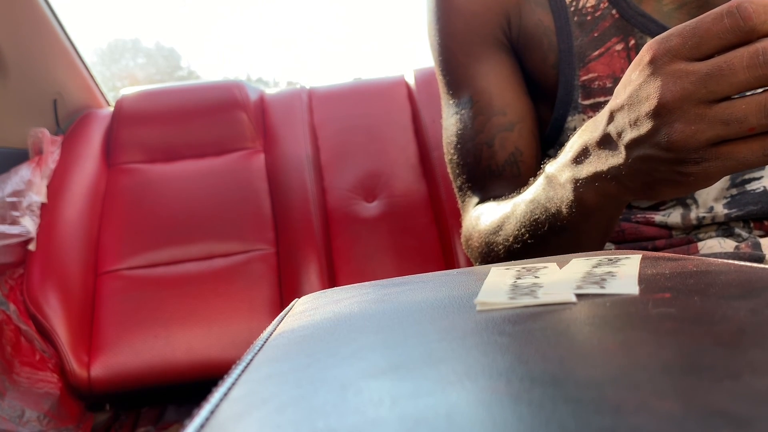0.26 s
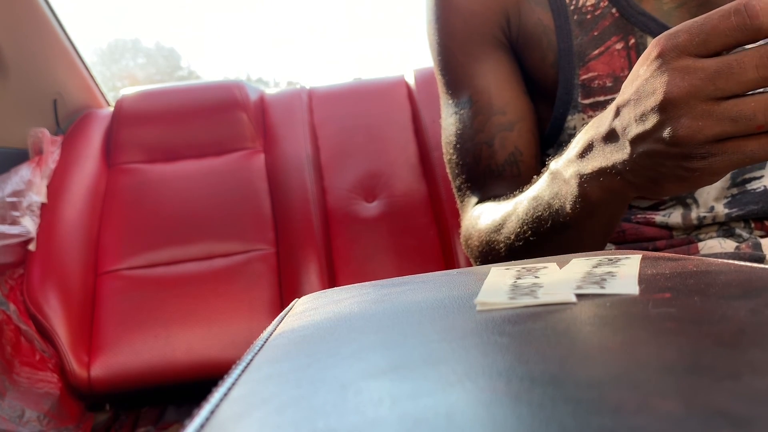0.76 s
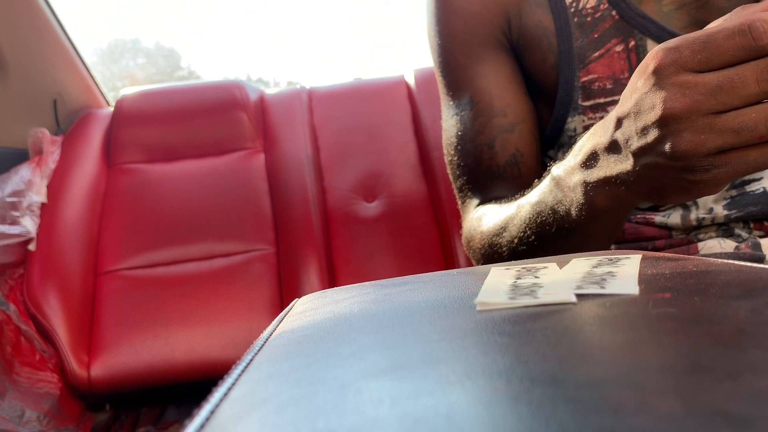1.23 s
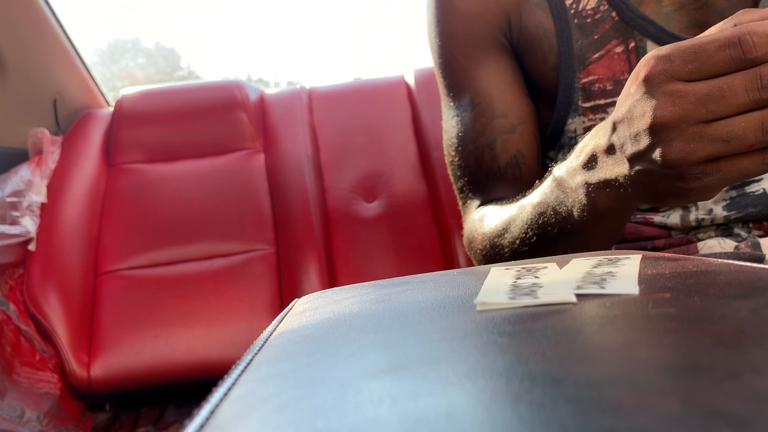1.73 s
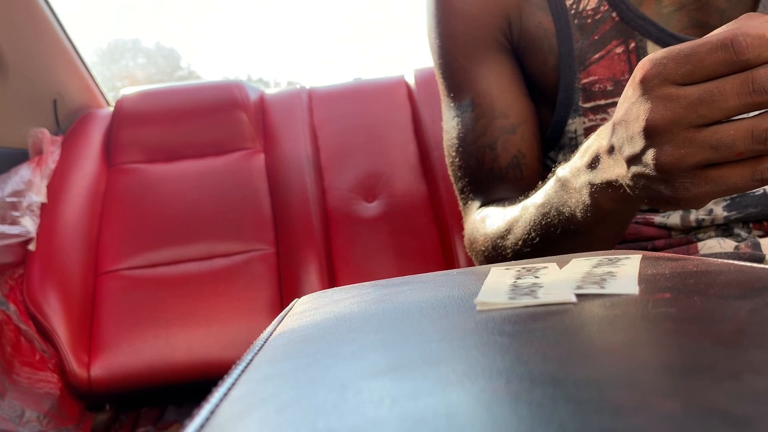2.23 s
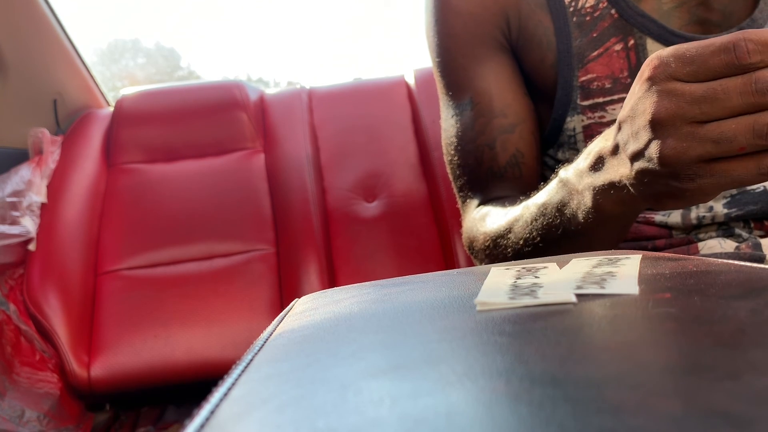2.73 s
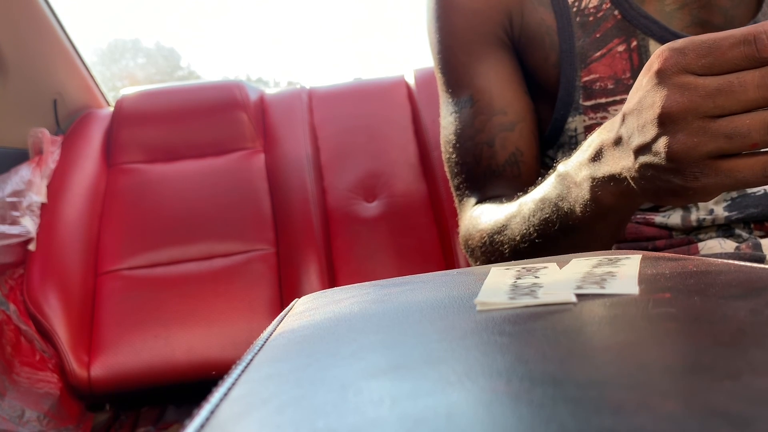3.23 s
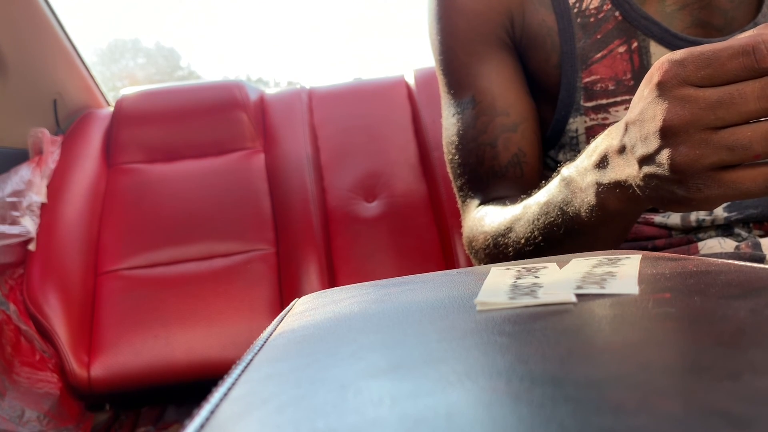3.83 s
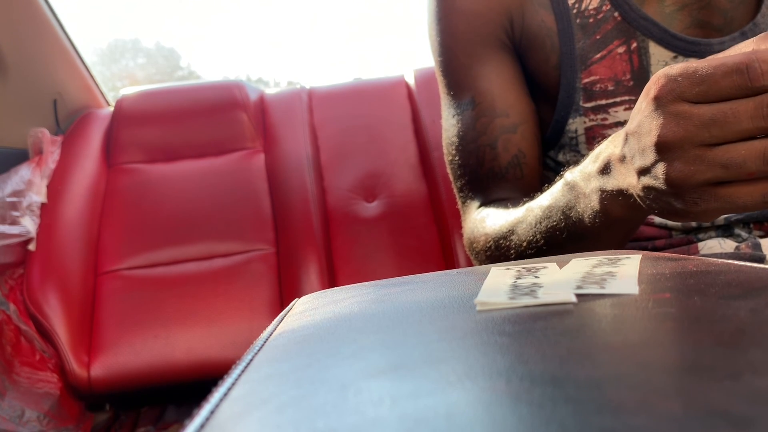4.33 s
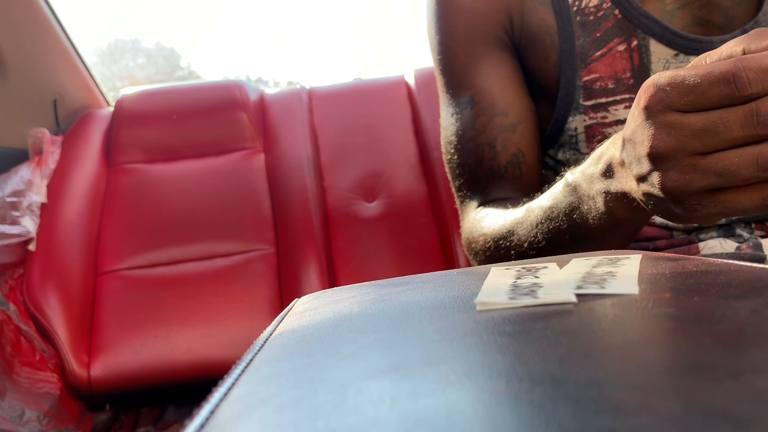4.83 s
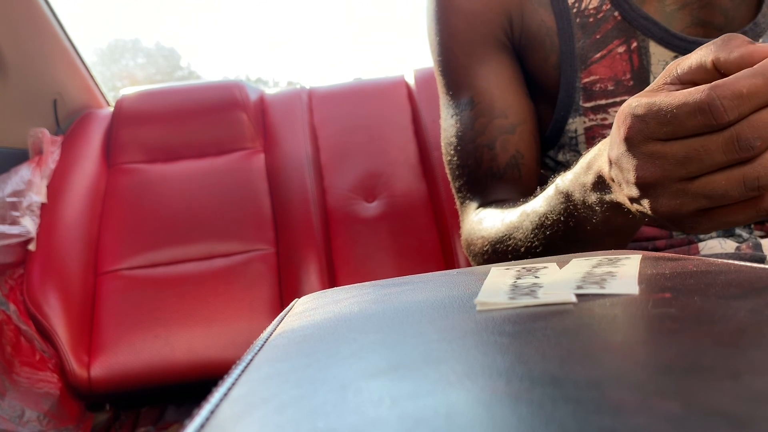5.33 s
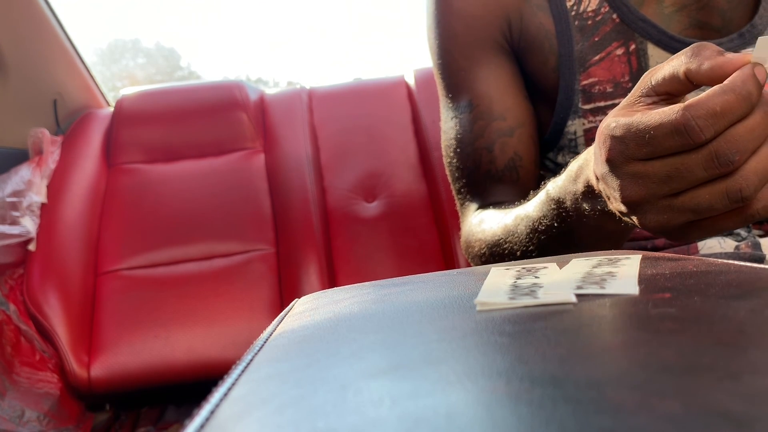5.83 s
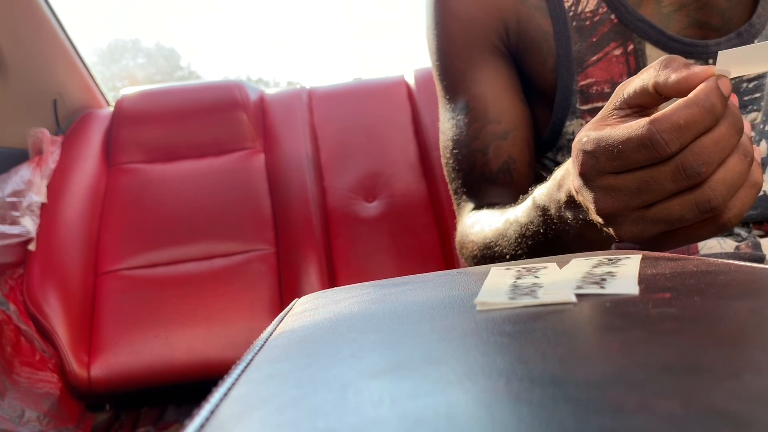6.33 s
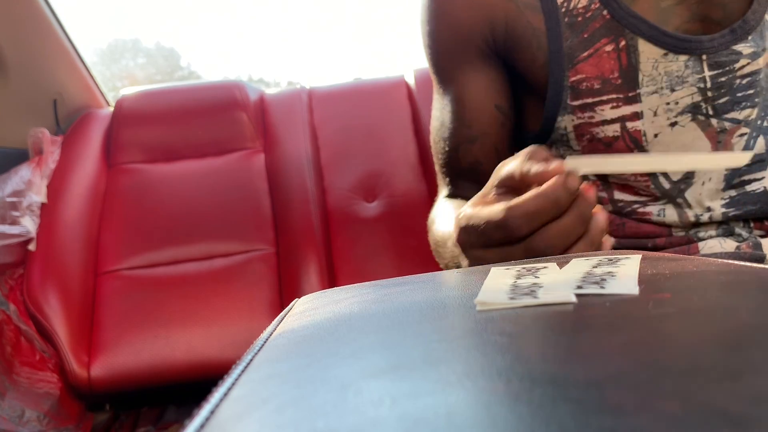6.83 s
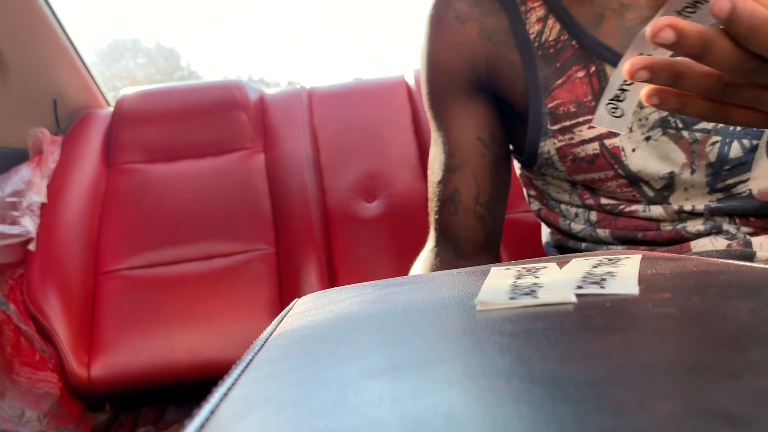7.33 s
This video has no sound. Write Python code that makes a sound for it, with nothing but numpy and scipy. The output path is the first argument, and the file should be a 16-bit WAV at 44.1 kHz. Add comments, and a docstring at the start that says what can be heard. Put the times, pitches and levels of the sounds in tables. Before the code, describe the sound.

Bright, dry snaps and fine sticky crackle as fingers peel a vinyl decal, over the low engine boom and rumble of a moving car.

```python
"""Decal peeling in a moving car

Fingers peel a vinyl decal from its backing, to the right of a phone, as the car pulls away gently.
The sheet snaps in filtered bursts of slips; random tiny fractures make the crackle of the glue.
Filtered noise brushes softly as skin and cloth. Below, sine orders make the engine boom;
shaped noise makes the road rumble, tyre rush, street murmur and an even hiss."""
import sys
import numpy as np
from scipy import signal
from scipy.fft import rfft, irfft, next_fast_len
from scipy.io import wavfile
from scipy.ndimage import uniform_filter1d

SR = 44100
rng = np.random.default_rng(int(sys.argv[2]) if len(sys.argv) > 2 else 0)


def transcribe(u):
    """Save the signal u as a 16-bit wav file named by the first command-line argument.

    u: samples, shape (n,) or (channels, n), limited to [-1, 1]; the rate is SR.
    q: integer samples, one column per channel.
    """
    v = np.clip(np.atleast_2d(u).T, -1, 1)
    q = np.round(v * 32767).astype(np.int16)
    wavfile.write(sys.argv[1], SR, q)


N = 333837
TIME = np.arange(N) / SR

# snaps of the sheet: (time [s], relative level [dB], ring [Hz],
#   relative body below 2.4 kHz [dB], relative edge above 12 kHz [dB])
SNAPS = [(0.2882, -44.5, 4230, -10, -47), (0.829, -47.5, 4200, 3, -6), (0.836, -57, 4620, 0, -10),
         (0.9053, -38, 6460, -6, -25), (0.9114, -37.5, 6720, -6, -19), (0.9298, -29, 6250, -16, -17),
         (0.9418, -34, 6360, -10, -21), (0.9454, -34.5, 6990, -15, -11), (0.9534, -34.5, 4790, -14, -31),
         (0.9911, -32, 8700, -13, -8), (1.9674, -53, 6545, -35, -27), (2.4593, -55, 4000, -19, -11),
         (2.4773, -46, 8780, -10, -7), (2.5052, -50.5, 7930, -6, -8), (3.0126, -47.5, 7250, -25, -22),
         (3.0944, -52.5, 7390, -20, -7), (3.4007, -40, 8700, -14, -11), (3.5384, -38.5, 7200, -17, -14),
         (3.6157, -50, 6740, -18, -7), (3.6431, -37, 8300, -52, -11.5), (4.0213, -43, 8080, -12.5, -11),
         (4.2253, -45.5, 7464, -50, -24), (4.2956, -30.5, 7055, -13, -6), (4.3221, -36, 6700, -19, -19),
         (4.4842, -38.5, 7100, -16, -2), (4.5291, -39.5, 6850, -21, -30), (4.6109, -41, 6503, -25, -18),
         (4.6558, -31, 6960, -18, -1), (4.6833, -34.5, 7210, -36, -11), (4.7455, -37.5, 6410, -32, -18),
         (4.776, -33, 6360, -23.5, -21), (4.8155, -36.5, 6030, -28, -19), (4.9077, -39, 5897, -13, -9),
         (4.997, -38.5, 6250, -34, -14), (5.012, -38, 7560, -35.5, -27), (5.0788, -42, 6650, -23, -25),
         (5.0923, -35, 6540, -62, -26), (5.1271, -38, 6630, -25, -20), (5.1766, -33.5, 6294, -36, -10),
         (5.2515, -34.5, 8590, -57, -6.5), (5.2979, -37, 8320, -16, 0), (5.3398, -21, 7390, -31.5, -19),
         (5.4241, -21, 7130, -18, -2.5), (5.5338, -27.5, 8580, -27, 0), (5.5458, -31.5, 8220, -43, -7),
         (5.6321, -38, 6730, -53, -46), (5.7399, -34, 6360, -38, -26), (5.8517, -40, 6567, -41, -43),
         (5.89, -40, 6517, -29, -22), (5.9756, -42, 6370, -41, -34), (6.0302, -28, 6300, -26, -31),
         (6.1569, -31.5, 8105, -43, -16), (6.3809, -46.5, 5530, -33, -16),
         (6.4906, -25.5, 7850, -17.5, -18), (6.5665, -35, 8260, 0.5, -2.5), (6.6039, -41, 5734, -3, -22)]
# colour of the vinyl sheet: (frequency [Hz], level [dB])
SHEET_COLOUR = [(200, -33), (700, -13), (1500, -3), (3000, -15), (4500, -2), (6500, 1), (8500, 1),
                (11000, -7.5), (15500, -13)]
# tugs that lift the strip: (start at half level [s], length [s], crackle level before sag [dB])
TUGS = [(3.503, 0.04, -82), (3.908, 0.14, -75.5), (4.21, 0.15, -72), (4.285, 0.28, -67),
        (4.608, 0.27, -64.5), (4.902, 0.051, -61), (4.965, 0.17, -65), (5.173, 0.013, -56),
        (5.29, 0.052, -59), (5.489, 0.031, -65), (5.539, 0.27, -69), (5.873, 0.2, -74), (6.108, 0.028, -65),
        (6.203, 0.5, -80.5)]
# strokes of skin and cloth: (centre time [s], length [s], peak level [dB], centre frequency [Hz])
SLIDES = [(0.333, 0.2, -88, 15000), (0.653, 0.061, -82, 8800), (4.365, 0.15, -65, 14100),
          (7.071, 0.34, -77, 11950), (7.206, 0.068, -72.5, 5063)]
# left port against right, for sound from the right: (frequency [Hz], lag [s], level [dB])
PORTS = [(300, .00027, 0), (2500, .00021, 0), (4000, .00029, -3), (5700, .00030, -8), (6400, .00031, -5),
         (7700, .000265, 1), (9000, .00026, -1), (15000, .00026, 0)]
# mean engine speed: (time [s], firing rate [Hz])
ENGINE_SPEED = [(0, 59.75), (0.8, 63.5), (2.08, 67.84), (2.2, 56.6), (3.3, 58.84), (3.55, 71), (3.85, 81.7),
                (4.3, 83.13), (4.9, 85.37), (5.4, 92.64), (5.7, 94.4), (6.05, 100.6), (6.75, 105.3),
                (7.57, 99.4)]
# engine load, swelling the firing tone: (start at half level [s], length [s], level before sag [dB])
SURGES = [(2.23, 1.16, -39), (3.502, 0.22, -34), (3.758, 0.12, -39.5), (3.934, 0.91, -39),
          (5.035, 0.624, -46.5), (5.953, 0.132, -49), (6.491, 0.23, -55)]
# rough road: (centre time [s], full width at 1/e [s], tyre rush level [dB], body rumble level [dB])
PATCHES = [(0.152, 0.77, -94, -54.5), (2.07, 0.47, -67.5, -44.5), (2.263, 0.24, -57.5, -64),
           (2.65, 1, -67.5, -52.5), (3.6, 0.61, -64, -52), (3.956, 0.54, -74, -48.5),
           (6.016, 0.64, -71.5, -48.5), (6.202, 0.23, -63.5, -54.5), (6.578, 0.33, -65, -57),
           (7.52, 0.38, -64.5, -52)]
# colour of the body rumble: (frequency [Hz], level [dB])
RUMBLE_COLOUR = [(15, -23.5), (25, -18), (38, 0.5), (55, 5.5), (72, -0.5), (100, -13), (135, -12.5),
                 (180, -16.5), (250, -27.5), (500, -57), (2000, -100)]
# colour of the tyre rush: (frequency [Hz], level [dB])
RUSH_COLOUR = [(120, -16), (190, -8.5), (270, -6), (320, -1.5), (370, 0.5), (410, -4), (465, 2.5),
               (520, -9.5), (580, -1), (690, -17), (900, -8.5), (1300, -42), (2500, -41.5), (5000, -68),
               (9000, -100)]
# colour of the street murmur: (frequency [Hz], level [dB])
STREET_COLOUR = [(150, -20.5), (400, 0.5), (750, -1.5), (1150, 1), (1450, -6), (1650, -7.5), (2000, -12),
                 (2400, -12), (3200, -19), (5000, -20.5), (9000, -38)]
# colour of the even hiss: (frequency [Hz], level [dB])
HISS_COLOUR = [(1500, -6), (3000, 0), (5500, 2), (7500, -1), (8500, 0), (10000, 0), (12000, -2.5),
               (16000, -5)]

SETTLE_LIMIT_DB = -25.5  # snaps listed above this level free no extra threads
TICK_SHORT_HZ, TICK_LONG_HZ = 7200, 6440  # flap ring when a thick thread breaks: short strip, long strip
TUG_ATTACK_S, TUG_RELEASE_S, TUG_SAG_DB_PER_S = 0.016, 0.079, -17
SURGE_ATTACK_S, SURGE_RELEASE_S, SURGE_SAG_DB_PER_S = 0.11, 0.14, -4.5
ROLLING_S = (3.1, 8.1)  # the car gathers speed between these times
IDLE_DB, IDLE_FADE_DB = -53.5, -18.5  # unloaded firing tone, and its fall as the car gets going
BOOM_HZ, BOOM_WIDTH_HZ, BOOM_DB = 196.4, 17.2, -57  # cabin resonance that the octave crosses
LIFT_S, LIFT_LENGTH_S, LIFT_DB = 6.63, 0.23, -7  # the driver eases off and the octave fades
RUMBLE_DB, RUMBLE_RISE_DB = -54.5, 7.5  # start level, rise with speed
RUSH_DB, RUSH_RISE_DB = -76, 9
TOP_HZ = 16000


def snaps(gain_db=8, burst_s=0.00061, grit=0.28, body_db=18, edge_db=17, ring_db=4, onset_s=.0008, size=512):
    """Each buckle of the sheet is one sharp slip and a sub-millisecond burst of smaller ones."""
    out = np.zeros(N + size)
    decay = np.exp(-np.arange(size) / SR / burst_s)
    slips = grit * rng.standard_normal((len(SNAPS), size)) * decay
    slips[:, 0] = 1
    sheet = response(SHEET_COLOUR)
    for (s, db, hz, body, edge), slip in zip(SNAPS, slips):
        # the free flap rings briefly
        flap = response([(hz * 1.2, 0), (hz, ring_db), (hz * 1.17, 0)])
        click = ring(ring(slip, sheet), flap)
        # per-snap balance of body and edge
        low_db = body + body_db
        tilt = response([(2400, low_db), (3600, low_db / 2 - 4.5), (5500, 0.0054), (8500, 0),
                         (12000, edge + edge_db)])
        click = ring(click, tilt)
        start = int((s + onset_s) * SR)
        out[start:start + size] += undb(db + gain_db) * click / np.linalg.norm(click)
    return out[:N]


def crackle(settle_db=-25, settle_s=0.0061, strain_s=0.004, tick_db=-1, catch_db=3):
    """Glue threads break one by one with each tug, thick ones with a tick; more give way around each snap."""
    peeling = sum(swell(s, length, db, TUG_ATTACK_S, TUG_RELEASE_S, TUG_SAG_DB_PER_S)
                  for s, length, db in TUGS)
    peeling = peeling * undb(catch_db * walk(50))  # the glue catches and gives

    settling = np.zeros(N)
    around = np.arange(-SR // 50, SR // 16)
    # strain builds before the snap, settling follows it
    fade = np.exp(-np.abs(around) / SR / np.where(around < 0, strain_s, settle_s))
    for s, db, *_ in SNAPS:
        settling[int(s * SR) + around] += undb(min(db, SETTLE_LIMIT_DB) + settle_db) * fade

    threads = breaks(per_s=360, scatter_db=6.5) * peeling
    threads = threads + breaks(per_s=1100, scatter_db=6) * settling
    thick = undb(tick_db) * breaks(per_s=120, scatter_db=0.5) * peeling

    # the freed strip grows longer, so its ring sinks
    short = response([(1000, 3.0), (2400, -5.5), (3700, -1), (5500, -15), (6800, -9.5), (8500, -1),
                      (11500, -12.5), (15000, -6)])
    long = response([(1000, 3), (3500, -8), (5000, -12.0), (6300, 8), (8500, -4.5), (11500, 4), (15000, 4)])
    freed = np.interp(TIME, [5.4, 5.75], [0, 1])
    sheet = response(SHEET_COLOUR)
    fine = (1 - freed) * ring(threads, short) + freed * ring(threads, long)
    fine = ring(fine, sheet / np.linalg.norm(sheet))
    ticks = (1 - freed) * flap_ticks(thick, TICK_SHORT_HZ) + freed * flap_ticks(thick, TICK_LONG_HZ)
    return fine + ticks


def breaks(per_s, scatter_db):
    """Random tiny fractures, most small and a few larger; rms 1."""
    sizes = undb(scatter_db * np.minimum(rng.exponential(size=N), 3))
    signs = rng.choice([-1, 1], N)
    return unit((rng.random(N) < per_s / SR) * sizes * signs)


def flap_ticks(x, hz, skirt_db=-20):
    """Breaks heard through the single ring of the free flap."""
    flap = response([(hz * 0.5, -26), (hz * 0.59, -8), (hz, 0), (hz * 1.13, -5), (hz * 2.35, skirt_db)])
    return ring(x, flap / np.linalg.norm(flap))


def slides(skirt_db=-14):
    """Skin and cloth brush the sheet in short swells of fine hiss."""
    out = np.zeros(N)
    for s, length, db, hz in SLIDES:
        stroke = np.cos(np.pi * np.clip((TIME - s) / length, -.5, .5))
        brush = noise([(hz / 8, -40), (hz * 0.71, skirt_db), (hz, 0), (hz * 1.36, skirt_db)])
        out += undb(db) * stroke * brush
    return out


def cabin(x, near_db=-10, near_t60_s=0.0071, tail_db=-14, tail_t60_s=0.094, diffuse_db=-9):
    """Hands and dashboard scatter the sound at once; the padded cabin adds a short tail."""
    t = TIME[:SR // 4]

    def echoes(t60_s):
        """Decaying noise of unit energy after a short gap."""
        h = rng.standard_normal(len(t)) * np.exp(-np.log(1000) * t / t60_s) * (t > .0007)
        return h / np.linalg.norm(h)

    wet = ring(x, undb(near_db) * echoes(near_t60_s) + undb(tail_db) * echoes(tail_t60_s))
    coloured = ring(x, response([(900, -16), (2400, 14.5), (3600, 10.5), (6000, 1.0), (8500, 2.0), (15000, 5)]))
    diffuse = np.array([ring(coloured, echoes(tail_t60_s)) for _ in range(2)])
    return ports(x + wet) + undb(diffuse_db) * diffuse


def engine(shaft_db=-59, waver_db=0.6, octave_db=-74):
    """Only the lowest orders pass the bulkhead: the firing tone, its octave and the turning shaft."""
    hz, = curves(ENGINE_SPEED)
    idle = undb(IDLE_DB + IDLE_FADE_DB * np.interp(TIME, ROLLING_S, [0, 1]) ** 2)
    load = sum(swell(s, length, db, SURGE_ATTACK_S, SURGE_RELEASE_S, SURGE_SAG_DB_PER_S)
               for s, length, db in SURGES)
    resonance = 1 / (1 + (2 * (2 * hz - BOOM_HZ) / BOOM_WIDTH_HZ) ** 2)
    lift_db = LIFT_DB * np.clip((TIME - LIFT_S) / LIFT_LENGTH_S, 0, 1)
    phase = 2 * np.pi * np.cumsum(hz * (1 + 0.0035 * walk(14))) / SR
    phase = phase + np.array([[-.14], [.14]])  # the standing wave differs a little between the ports
    firing = np.hypot(idle, load) * undb(waver_db * walk(22.08)) * np.sin(phase)
    octave_level = np.hypot(undb(octave_db), undb(BOOM_DB) * resonance)
    octave = octave_level * undb(lift_db + 0.91 * walk(24)) * np.sin(2 * phase)
    shaft = undb(shaft_db + 2 * walk(15)) * np.sin(phase / 2)
    return np.sqrt(2) * (firing + octave + shaft) * undb([[-.8], [.8]])


def road(street_db=-75, street_rise_db=4):
    """Body rumble, tyre rush and street murmur grow with speed; each rough patch swells the first two."""
    speed = np.interp(TIME, ROLLING_S, [0, 1])
    shaking = undb(RUMBLE_DB + RUMBLE_RISE_DB * speed)
    rushing = undb(RUSH_DB + RUSH_RISE_DB * speed)
    for s, width, rush_db, rumble_db in PATCHES:
        patch = np.exp(-(2 * (TIME - s) / width) ** 2)
        shaking = np.hypot(shaking, undb(rumble_db) * patch)
        rushing = np.hypot(rushing, undb(rush_db) * patch)

    sway = noise([(20, -16.0), (60, 11.5), (110, 8.5), (190, -9.5), (300, -23), (700, -32.5), (3000, -84.5)])
    rumble = spread(noise(RUMBLE_COLOUR), sway, side_db=-10.5, pan_db=-1.9)
    rumble = rumble * shaking * undb(walk(10))

    rush = ports(noise(RUSH_COLOUR))
    rush = rush + spread(np.zeros(N), noise(RUSH_COLOUR), side_db=-11.0, pan_db=-20)
    rush = rush * rushing * undb(1.1 * walk(15)) * undb([[1.8], [-1.8]])

    waver_db = 0.7 * walk(9)
    street = spread(noise(STREET_COLOUR), noise(STREET_COLOUR), side_db=0.5, pan_db=1.4)
    return rumble + rush + street * undb(street_db + street_rise_db * speed + waver_db)


def hiss(level_db=-82.5):
    """Faint even noise of fixed colour, passed through both ports."""
    return ports(undb(level_db) * noise(HISS_COLOUR))


def ports(x):
    """Sound from the right bends round the phone: later at the left port, its level varying with pitch."""
    size = next_fast_len(N + 64)
    bins = np.fft.rfftfreq(size, 1 / SR)
    hz, lag_s, db = np.transpose(PORTS)
    delay = np.exp(-2j * np.pi * bins * np.interp(bins, hz, lag_s))
    path = undb(np.interp(bins, hz, db)) * delay
    return np.array([irfft(rfft(x, size) * path, size)[:N], x])


def spread(mid, side, side_db, pan_db):
    """Left and right from a shared and an opposed part; positive pan favours the left."""
    pan = undb(np.array([[pan_db], [-pan_db]]) / 2)
    return (mid + undb(side_db) * side * np.array([[1], [-1]])) * pan


def swell(s, length, db, attack_s, release_s, sag_db_per_s):
    """Envelope of one tug or surge: attack, a sagging hold, release."""
    inside = np.minimum((TIME - s) / attack_s, (s + length - TIME) / release_s)
    return undb(db + sag_db_per_s * np.clip(TIME - s, 0, length)) * np.clip(inside + .5, 0, 1)


def walk(rate_hz):
    """Smooth random wander of rms 1."""
    k = int(SR / rate_hz)
    steps = np.repeat(rng.standard_normal(N // k + 1), k)
    return unit(uniform_filter1d(uniform_filter1d(steps, k), k)[:N])


def noise(points):
    """Steady noise of rms 1 with the colour of (frequency [Hz], level [dB]) points."""
    size = next_fast_len(N)
    spectrum = rfft(rng.standard_normal(size)) * undb(colour_db(points, size))
    return unit(irfft(spectrum, size)[:N])


def response(points, size=512):
    """Causal minimum-phase impulse response with the colour of (frequency [Hz], level [dB]) points."""
    cepstrum = irfft(np.log(undb(colour_db(points, size))))
    cepstrum[1:size // 2] *= 2
    cepstrum[size // 2 + 1:] = 0
    return irfft(np.exp(rfft(cepstrum)))


def colour_db(points, size):
    """Level at each FFT bin, joined by straight lines over log frequency."""
    hz, db = np.transpose(points)
    bins = np.maximum(np.fft.rfftfreq(size, 1 / SR), 1)
    return np.interp(np.log(bins), np.log(hz), db)


def ring(x, impulse):
    """Pass a sound through an impulse response."""
    return signal.fftconvolve(x, impulse)[:len(x)]


def curves(table):
    """Columns of a table, joined by straight lines in time."""
    s, *columns = np.transpose(table)
    return [np.interp(TIME, s, c) for c in columns]


def unit(x):
    """Scale to rms 1."""
    return x / np.sqrt(np.mean(x ** 2))


def undb(db):
    """Decibels to amplitude."""
    return 10 ** (np.asarray(db) / 20)


def scene():
    """The decal close by, the car around it and a faint even hiss."""
    decal = snaps() + crackle() + slides()
    return cabin(decal) + engine() + road() + hiss()


def record(dry):
    """The phone cuts the top with a steep low-pass."""
    return signal.sosfilt(signal.ellip(10, .2, 70, TOP_HZ, fs=SR, output="sos"), dry)


dry = scene()
out = record(dry)
transcribe(out)
```